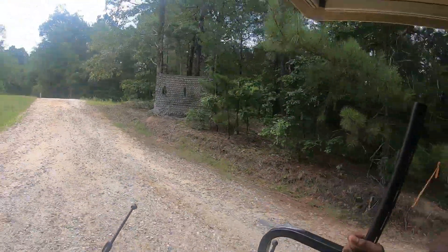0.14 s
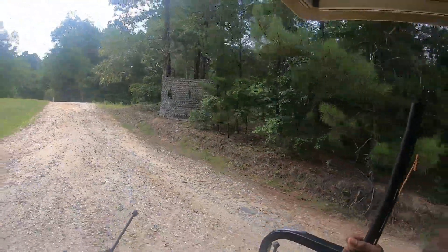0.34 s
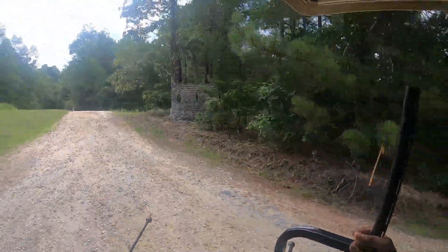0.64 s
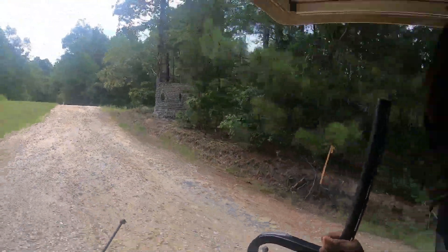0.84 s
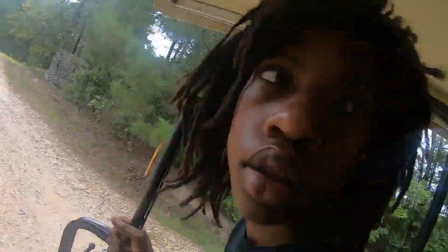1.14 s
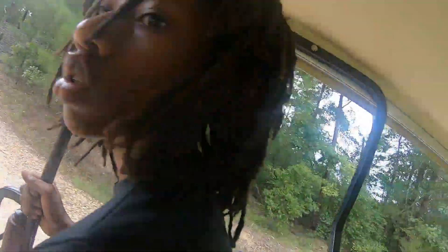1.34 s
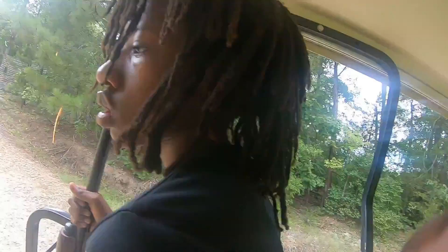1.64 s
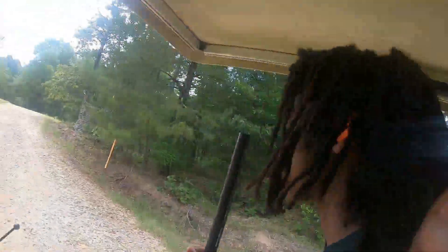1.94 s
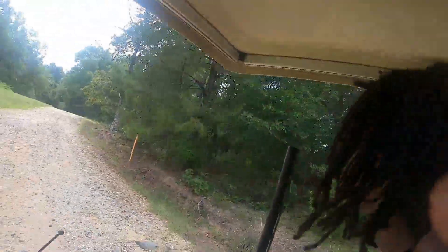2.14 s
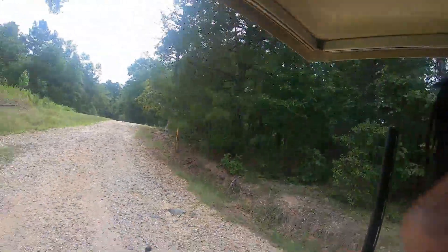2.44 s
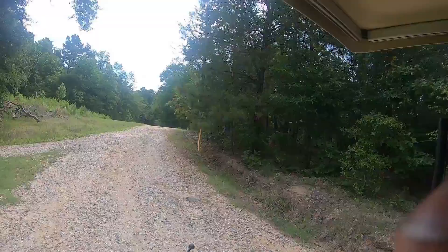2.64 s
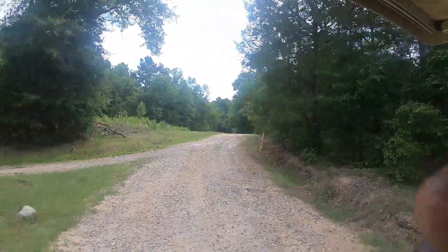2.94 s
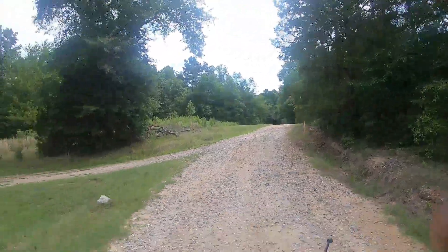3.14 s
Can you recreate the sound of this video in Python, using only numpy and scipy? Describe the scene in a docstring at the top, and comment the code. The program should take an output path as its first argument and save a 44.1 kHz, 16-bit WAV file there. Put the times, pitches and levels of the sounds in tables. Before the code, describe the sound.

Close at the seat of a cart on an outdoor gravel track, a muffled engine thumps quickly over deep rumble; bumps knock the body, small stones tick, and a loose panel rattles more towards the end.

```python
"""Uneven thumps through a silencer run throughout: a small two-cylinder cart engine on gravel, at the seat.
Timed pulses ring its pipe, silencer and seat cavity; locked sine tones whine along.
Around it filtered noise makes the rumble, the droning, ringing body, the tyre crunch and a rattling panel.
Short noise bursts are stones ticking on the frame and bumps knocking it.
The microphone is that of a muffled pocket camera, which cuts the top treble."""
import sys
import numpy as np
from scipy import signal
from scipy.fft import rfft, irfft
from scipy.io import wavfile
from scipy.ndimage import uniform_filter1d

SR = 44100
rng = np.random.default_rng(int(sys.argv[2]) if len(sys.argv) > 2 else 0)


def pcm_store(signal):
    """Save signal as 16-bit PCM."""
    levels = np.round(np.clip(np.atleast_2d(signal), -1, 1) * 32767)
    wavfile.write(sys.argv[1], SR, levels.astype(np.int16).T)


N = 145530
ATTACK_S = 0.0022  # rise of stones and knocks, and smoothing of the grit


def undb(db):
    """Amplitude factor of a level in dB."""
    return 10 ** (np.asarray(db) / 20)


def unit(x):
    """Scale to an RMS of 1."""
    return x / np.sqrt(np.mean(x ** 2))


def curve(table, axis):
    """One column of a table, interpolated over time."""
    rows = np.array(table)
    return np.interp(np.arange(N) / SR, rows[:, 0], rows[:, axis])


def colour(x, points):
    """Filter by (f/Hz, level/dB) points, joined over log frequency and steeply closed outside them."""
    p = np.array(points)
    f = np.fft.rfftfreq(N, 1 / SR) + 1  # 1 Hz up, to keep the logarithm finite
    octaves_below = np.log2(np.maximum(p[0, 0] / f, 1))
    octaves_above = np.log2(np.maximum(f / p[-1, 0], 1))
    level = np.interp(np.log(f), np.log(p[:, 0]), p[:, 1])
    return irfft(rfft(x) * undb(level - 120 * (octaves_below + octaves_above)), N)


def walk(rate):
    """Random levels held 1 / rate s and slewed twice; RMS 1."""
    hold = int(SR / rate)
    steps = np.repeat(rng.standard_normal(N // hold + 1), hold)
    return unit(uniform_filter1d(uniform_filter1d(steps, hold), hold)[:N])


def noise():
    """White noise."""
    return rng.standard_normal(N)


def resonate(x, hz, q):
    """Ring one resonance of quality q."""
    b, a = signal.iirpeak(hz, q, SR)
    return signal.lfilter(b, a, x)


def burst(s, db, t60):
    """Envelope of a blow: short rise, exponential fall."""
    age = np.maximum(np.arange(N) / SR - s, 0)
    return np.minimum(age / ATTACK_S, 1) * 1000. ** (-age / t60) * undb(db)


# Spectrum of the shaking at seat and microphone: f/Hz, level/dB
RUMBLE_SPECTRUM = [(28, -5), (45, -2), (80, -1.5), (150, -6), (220, -7), (300, -14), (450, -27.5)]
RUMBLE_DB, RUMBLE_FOLLOWS = -6.5, 0.12  # against the mean thump; share of the load's dB swings it follows


def rumble():
    """Wheels, air and engine shake the seat and the microphone, partly in step with the load."""
    load = curve(ENGINE_LEVELS, axis=1)
    db = RUMBLE_DB + load.mean() + RUMBLE_FOLLOWS * (load - load.mean()) + 3.1 * walk(4.92)
    return unit(colour(noise(), RUMBLE_SPECTRUM)) * undb(db)


# Rolling, for body and tyres: t/s, body drone level/dB, tyre hiss level/dB,
# drone around 200-370 Hz against the rest level/dB
ROLLING_LEVELS = [(0.05, -37, -57.5, 0.1), (0.16, -38.5, -59, -1.5), (0.94, -39.5, -59.5, 0.5),
                  (1.37, -39.5, -58.5, -7), (1.64, -37.5, -58, -3), (2.0, -37.5, -57, 1.5),
                  (2.53, -40, -54.5, 2.5), (2.81, -40.5, -56, 2.5), (2.97, -38, -55.5, 2.5),
                  (3.2, -40, -55, 3)]
# Spectrum of the panels around the seat: f/Hz, level/dB
DRONE_SPECTRUM = [(150, -31.5), (250, -2), (369, -9.5), (424, -3), (587, -5.5), (794, -6), (903, -7.5),
                  (1450, -13), (3300, -35), (4290, -81)]
# Ringing bands of the body: f/Hz, width/Hz, middle level against the drone/dB
BODY_RINGS = [(438, 27, -10), (712.6, 22, -5), (787, 43, -7)]


def body():
    """Panels drone broadly and ring in a few fixed bands that come and go."""
    drone = unit(colour(noise() * undb(1.18 * walk(70) + 0.57 * walk(16)), DRONE_SPECTRUM))
    low_drone = colour(drone, [(200, 0), (370, 0.0074)])
    out = drone + (undb(curve(ROLLING_LEVELS, axis=3)) - 1) * low_drone
    for hz, width, db in BODY_RINGS:
        ring = resonate(colour(noise(), DRONE_SPECTRUM), hz, hz / width)
        out = out + undb(db + 1.8 * walk(7.16)) * unit(ring)
    return unit(out) * undb(curve(ROLLING_LEVELS, axis=1))


# Loose panel, rattling in surges: t/s, level/dB
RATTLE_LEVELS = [(0.9, -54.5), (1.3, -53.5), (1.5, -39.5), (1.65, -41), (1.9, -46), (2.4, -51.5),
                 (2.66, -39), (2.76, -35), (2.78, -44), (3.0, -41.5), (3.25, -46)]
RATTLE_WIDTH_HZ, RATTLE_HZ, RATTLE_DRIFT_HZ = 66, 530.8, 12


def rattle():
    """A loose panel: slow noise on two carriers makes a narrow band around a drifting centre."""
    lowpass = signal.butter(3, RATTLE_WIDTH_HZ / 2, fs=SR, output="sos")
    slow = signal.sosfilt(lowpass, rng.standard_normal((2, N)))
    phase = 2 * np.pi * np.cumsum(RATTLE_HZ + RATTLE_DRIFT_HZ * walk(3)) / SR
    band = slow[0] * np.cos(phase) + slow[1] * np.sin(phase)
    return unit(band) * undb(curve(RATTLE_LEVELS, axis=1))


# The topmost treble against the hiss or crackle; it falls away for good
TOP_DB, TOP_ENDS_S, TOP_DROP_DB = -21, 2.07, -29


def top_share():
    """Gain of the topmost treble over time, with one quick fall."""
    t = np.arange(N) / SR
    fallen = np.clip((t - TOP_ENDS_S) / 0.058 + .5, 0, 1)
    return undb(TOP_DB + TOP_DROP_DB * fallen)


# Spectrum of the tyre hiss: f/Hz, level/dB
HISS_SPECTRUM = [(1760, -41), (3000, -34), (3440, -13), (4490, -1.5), (5690, -0.5), (7370, -17),
                 (7870, -14.5), (9130, -24), (10100, -33), (11200, -49), (14600, -65)]
# Spectrum of the topmost treble, for gravel and stones: f/Hz, level/dB
TOP_SPECTRUM = [(6590, -38), (11200, -9), (11900, 5), (13100, 4.5), (14600, 0.5), (15500, -8.5)]
# Spectrum of the grit lower down: f/Hz, level/dB
CRUNCH_SPECTRUM = [(900, 2), (2300, -9)]
CRUNCH_DB = 2  # against the hiss
GRIT_PER_S, GRIT_BUNCH_DB = 130, 4  # middle rate, and its swing
GRIT_SPREAD_DB, GRIT_T60_S, GRIT_DB = 3, .025, -3  # the last scales the grit's part in the hiss


def gravel():
    """Tyre hiss, roughened by small grit that comes in bunches; the same grit sounds in the top treble."""
    chance = GRIT_PER_S / SR * undb(GRIT_BUNCH_DB * walk(12))
    sizes = undb(GRIT_SPREAD_DB * np.minimum(rng.exponential(size=N), 4))
    spikes = (rng.random(N) < chance) * sizes
    decay = 1000 ** (-1 / (GRIT_T60_S * SR))
    grit = unit(signal.lfilter([1], [1, -decay], spikes))
    grit = uniform_filter1d(grit, int(ATTACK_S * SR))
    bed = noise() * undb(0.74 * walk(14)) + undb(GRIT_DB) * grit * noise()
    crunch = undb(CRUNCH_DB) * unit(colour(grit * noise(), CRUNCH_SPECTRUM))
    hiss = unit(colour(bed, HISS_SPECTRUM))
    top = unit(colour(bed, TOP_SPECTRUM)) * top_share()
    return (crunch + hiss + top) * undb(curve(ROLLING_LEVELS, axis=2))


# Spectrum of a stone's crackle: f/Hz, level/dB
CRACK_SPECTRUM = [(1760, -46.5), (3000, -20), (3560, -6), (4340, -2.5), (4870, -0.5), (7610, -11.5),
                  (11200, -29), (14600, -57)]
# Stones ticking on the frame: t/s, bright crackle level/dB, part below about 3 kHz against it/dB
STONE_HITS = [(0.186, -51, 6.5), (0.425, -47.5, -10.5), (0.45, -47.5, -2), (0.622, -46, -6),
              (1.055, -46.5, -4.5), (1.1182, -33, -1.5), (1.59, -50, -22), (1.66, -44, -14),
              (1.9879, -46, -7), (2.0187, -45, -14), (2.0449, -45.5, -15), (2.1662, -43.5, -9.5),
              (2.3002, -50, -4), (2.3446, -45.5, -10), (2.371, -49, -17), (2.4234, -47, -5),
              (2.4346, -46, -1), (2.4569, -52, -24), (2.4933, -37.5, -14.5), (2.5553, -42.5, -7),
              (2.6224, -49, -12), (2.8712, -45.5, -15), (2.969, -50, -5), (3.0044, -43, -19),
              (3.2144, -44.5, -3)]
STONE_T60_S, STONE_GRAIN_DB = 0.056, 1.5
STONE_HZ, STONE_SPREAD, STONE_Q = 4900, .07, 2.5  # every stone has its own band around this centre


def stones():
    """Each stone is a quick, grainy burst of crackle that dies in a few hundredths of a second."""
    grain = noise() * undb(STONE_GRAIN_DB * walk(400))
    crack = unit(colour(grain, CRACK_SPECTRUM))
    low = unit(colour(grain, [(800, -5), (3100, -0.5)]))
    top = unit(colour(grain, TOP_SPECTRUM)) * top_share()
    out = 0
    for (s, db, low_db), chance in zip(STONE_HITS, rng.standard_normal(len(STONE_HITS))):
        own = resonate(crack, STONE_HZ * np.exp(STONE_SPREAD * chance), STONE_Q)
        out = out + burst(s, db, STONE_T60_S) * (unit(own + 0.27 * crack) + top + undb(low_db) * low)
    return out


# Bumps in the track that knock the body: t/s, centre f/Hz, level/dB
BUMPS = [(0.141, 720, -36.5), (0.279, 510, -28), (0.836, 380, -27.5), (1.121, 950, -38.5),
         (1.421, 670, -31), (1.624, 632, -32), (1.985, 780, -32.5), (2.105, 740, -38.5), (2.307, 1420, -41),
         (2.397, 760, -36), (2.494, 600, -30), (2.547, 640, -30), (2.974, 538, -26), (3.109, 555, -32.5),
         (3.258, 520, -33)]
KNOCK_T60_S, KNOCK_WIDTH = .12, .25  # width of each resonance pass as a share of its centre


def knocks():
    """Each bump shakes a broad resonance of the body for a moment."""
    out = 0
    for s, hz, db in BUMPS:
        q = 1 / KNOCK_WIDTH
        shaken = resonate(resonate(noise(), hz, q), hz, q)
        out = out + burst(s, db, KNOCK_T60_S) * unit(shaken)
    return out


# Thin tones locked to the engine: multiple of the cycle, middle level/dB, from t/s, to t/s (half faded)
WHINE_TONES = [(20, -51, 0.25, 2.9), (32, -45.5, .6, 2.1), (36, -49.5, 0.16, 1.26), (46, -50.5, 0.51, 1.6)]


def whines(turns):
    """Tones that follow the engine, fade in and out and waver."""
    t, out = np.arange(N) / SR, 0
    for order, db, start, end in WHINE_TONES:
        gate = np.clip(np.minimum(t - start, end - t) / 0.63 + .5, 0, 1)
        level = undb(db + 1.6 * walk(6.7))
        out = out + gate * level * np.sin(2 * np.pi * round(order) * turns + 0.24 * walk(12))
    return out


FIRST_TURN = 0.3286  # offset of the cycle starts, in cycles
SCATTER_DB, JITTER_S = 1.2, .0002  # unevenness of pulse size and time


def train(turns, pattern):
    """One pulse per cycle for each (place, size), a little uneven."""
    pulses, n = np.zeros(N), np.arange(-1, 90)
    for place, size in pattern:
        late, louder = rng.standard_normal((len(n), 2)).T
        # cycles outside the scene land outside the array and are dropped
        at = np.interp(n + FIRST_TURN + place, turns, np.arange(N), -SR, 2 * N) + JITTER_S * SR * late
        ok = (at >= 0) & (at < N)
        np.add.at(pulses, at[ok].astype(int), (size * undb(SCATTER_DB * louder))[ok])
    return pulses


# Engine load at the seat: t/s, upper thump level/dB, lower boom level/dB
ENGINE_LEVELS = [(0.0, -30, -27.5), (0.23, -22, -23), (0.43, -24.5, -31), (0.79, -20, -24),
                 (1.17, -26.5, -31.5), (1.23, -27.5, -24.5), (1.43, -29.5, -27.5), (1.56, -29, -25.5),
                 (1.87, -24.5, -27), (2.05, -29, -25), (2.46, -23, -32), (3.2, -30, -34.5)]
# Pressure pulses of a cycle, two firings each with a weaker pipe return: place in cycle (0-1), middle size
FIRING_PULSES = [(0.01, 1.05), (0.42, 0.39), (.62, 0.26), (0.24, 0.15)]
# Spectrum of the silencer: f/Hz, level/dB
SILENCER_SPECTRUM = [(120, -22), (135, -8), (155, -1), (178, -1), (200, -1.5), (225, -9), (270, -29.5),
                     (400, -48.5)]
# Spectrum of the cavity under the seat: f/Hz, level/dB
BOOM_SPECTRUM = [(70, -20.5), (88, -1), (108, 7.2), (130, -8.5)]
# Spectrum of a duller push once a cycle: f/Hz, level/dB
THROB_SPECTRUM = [(18, -12.5), (44, 0.5), (66, 2.7), (85, -14.5)]
THROB_PLACE, THROB_DB = 0.47, -7.5  # place in cycle; level against the mean boom
PIPE_HZ, PIPE_WIDTH_HZ, PIPE_DB = 159.5, 26, 5.5  # the pipe rings on after each pulse


def engine(turns):
    """Firings ring the pipe, the silencer and the seat cavity; under them the second firing pushes a duller,
    low throb."""
    firings = train(turns, FIRING_PULSES)
    throbs = train(turns, [(THROB_PLACE, 1)])
    piped = firings + undb(PIPE_DB) * resonate(firings, PIPE_HZ, PIPE_HZ / PIPE_WIDTH_HZ)
    thump_db, boom_db = curve(ENGINE_LEVELS, axis=1), curve(ENGINE_LEVELS, axis=2)
    out = 0
    for pulses, shape, db in ((piped, SILENCER_SPECTRUM, thump_db),
                              (firings, BOOM_SPECTRUM, boom_db),
                              (throbs, THROB_SPECTRUM, boom_db.mean() + THROB_DB)):
        # the load scales thump and boom before the spectrum shapes them; the throb keeps one mean level
        out = out + colour(pulses * undb(db), shape) / np.std(colour(pulses, shape))
    return out


# Engine speed along the track: t/s, cycle rate f/Hz
ENGINE_SPEED = [(0, 19.6), (.3, 20.45), (.8, 21.85), (1.06, 22.4), (2.14, 22.3), (2.47, 21.7), (3.05, 20.8),
                (3.3, 20.8)]


def scene():
    """All layers at the seat; engine and whines share one count of cycles."""
    turns = np.cumsum(curve(ENGINE_SPEED, axis=1)) / SR
    background = rumble() + body() + rattle()
    track = gravel() + stones() + knocks()
    return (background + track + whines(turns) + engine(turns))[None]


TOP_HZ = 15680


def record(dry):
    """The camera cuts the top: a steep low-pass."""
    return signal.sosfilt(signal.ellip(10, .2, 80, TOP_HZ, fs=SR, output="sos"), dry)


dry = scene()
out = record(dry)
pcm_store(out)
```